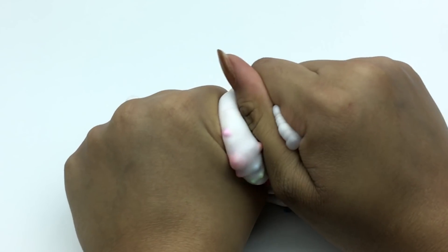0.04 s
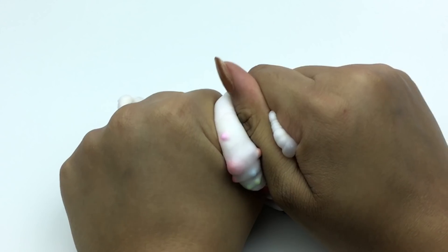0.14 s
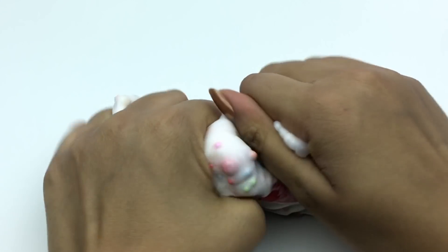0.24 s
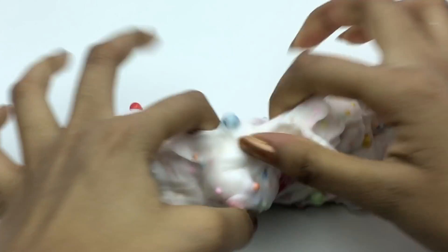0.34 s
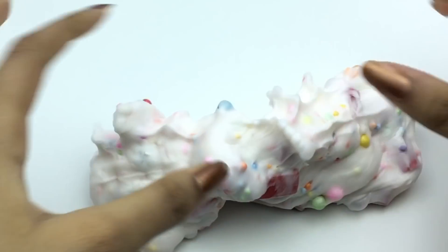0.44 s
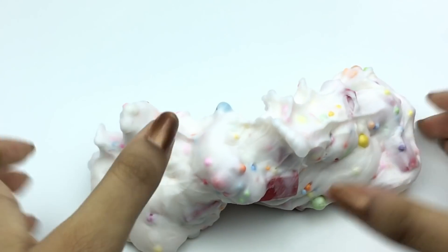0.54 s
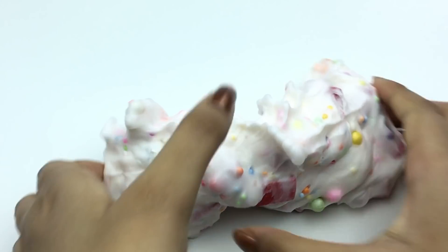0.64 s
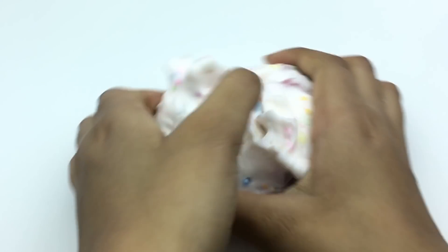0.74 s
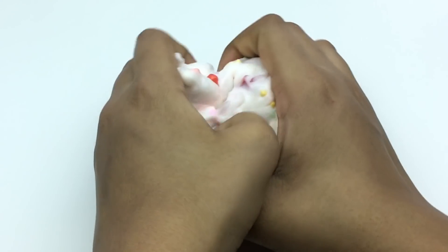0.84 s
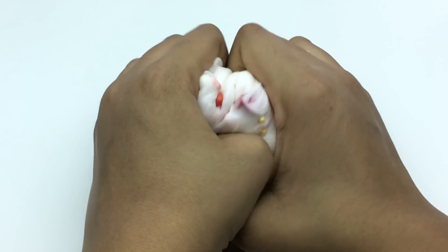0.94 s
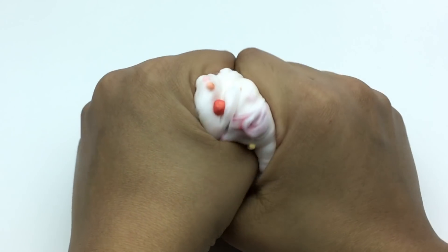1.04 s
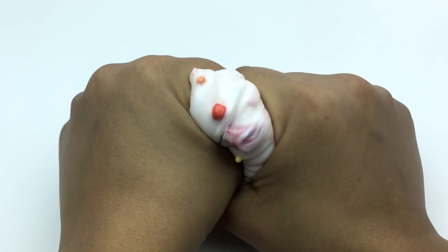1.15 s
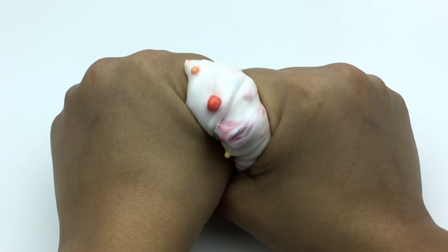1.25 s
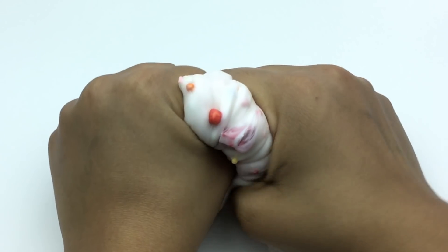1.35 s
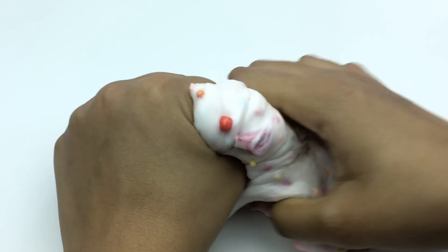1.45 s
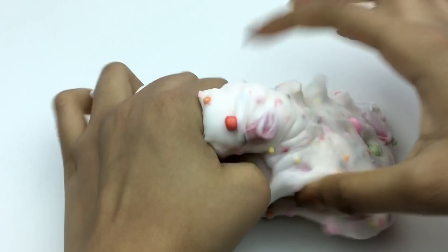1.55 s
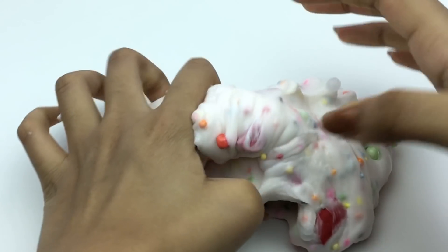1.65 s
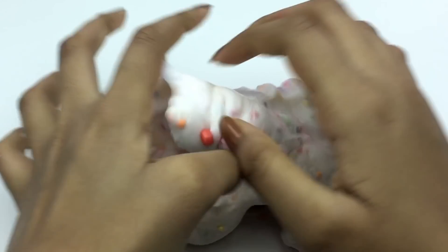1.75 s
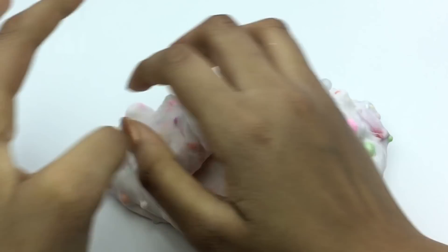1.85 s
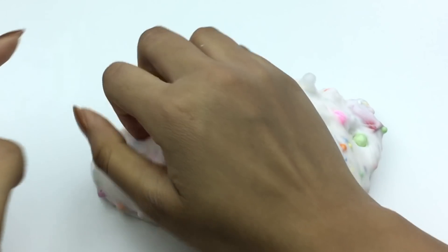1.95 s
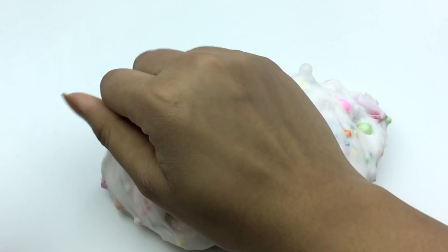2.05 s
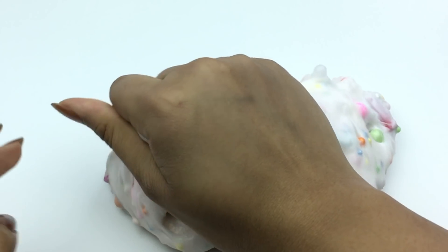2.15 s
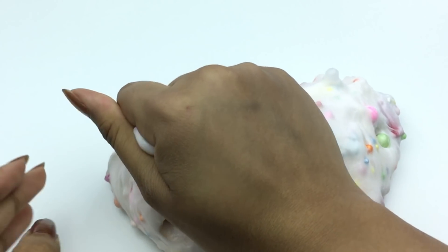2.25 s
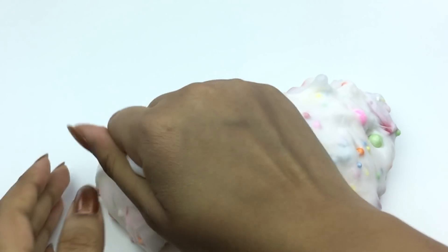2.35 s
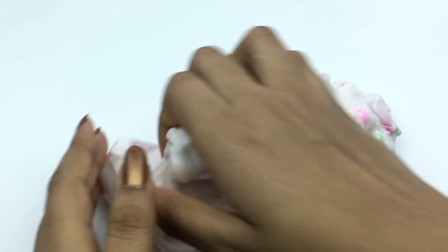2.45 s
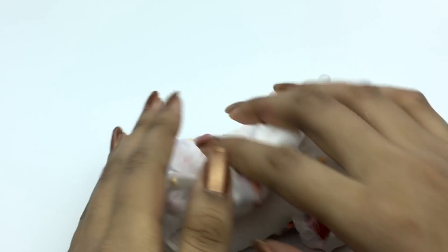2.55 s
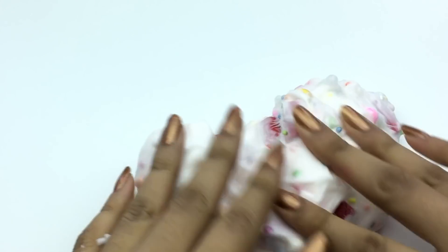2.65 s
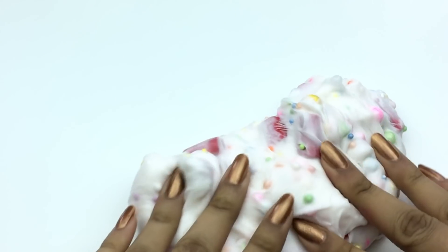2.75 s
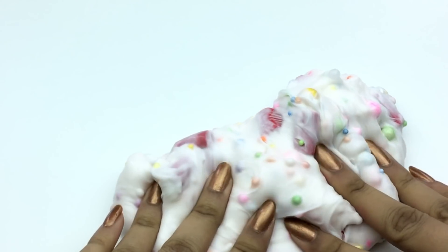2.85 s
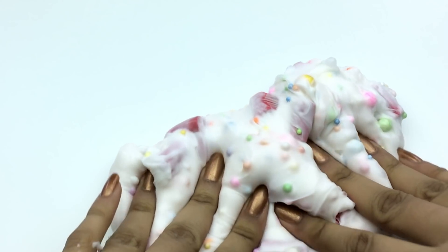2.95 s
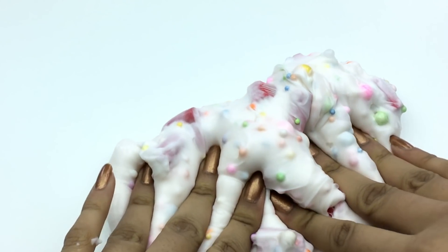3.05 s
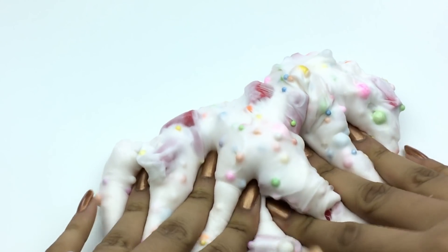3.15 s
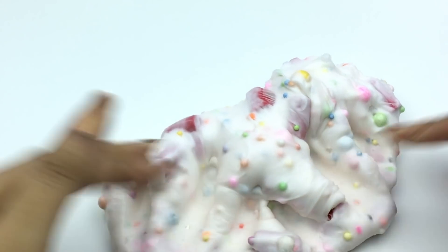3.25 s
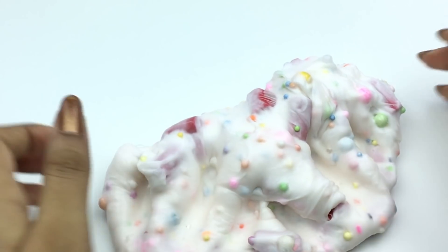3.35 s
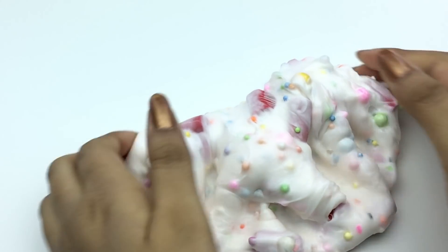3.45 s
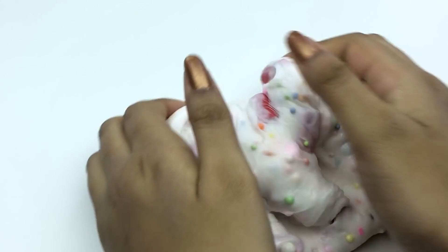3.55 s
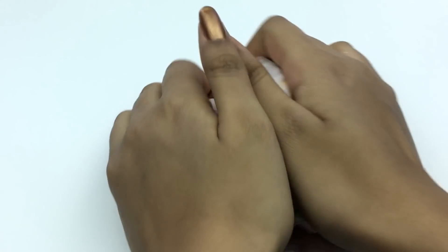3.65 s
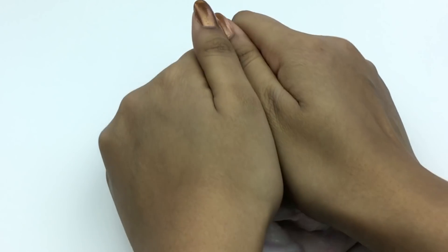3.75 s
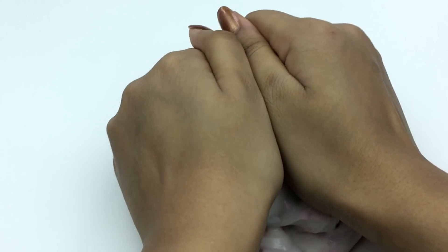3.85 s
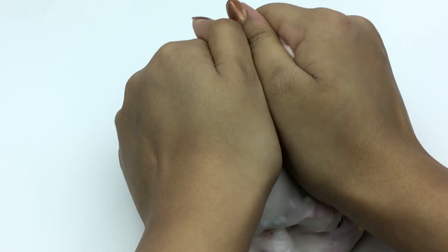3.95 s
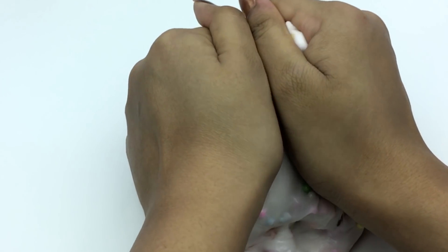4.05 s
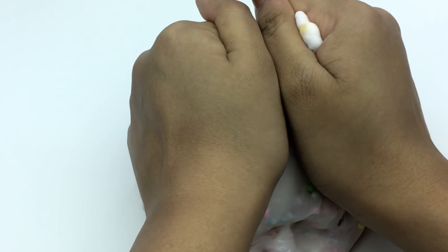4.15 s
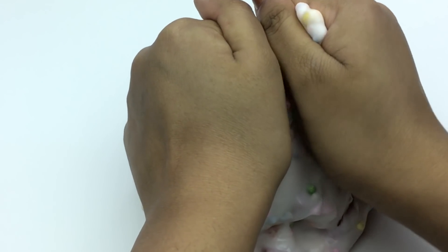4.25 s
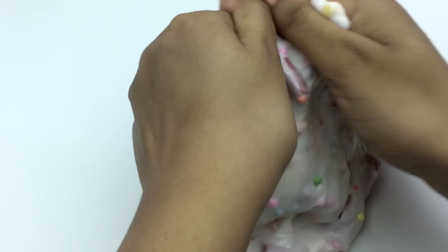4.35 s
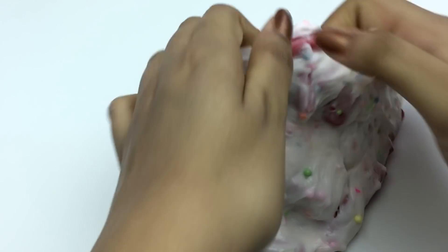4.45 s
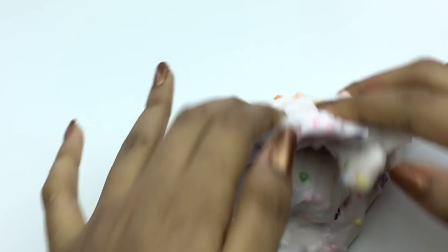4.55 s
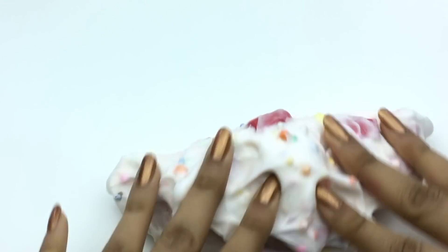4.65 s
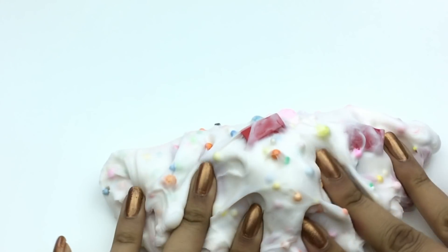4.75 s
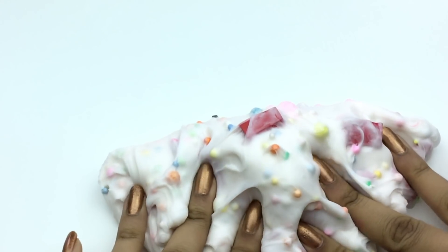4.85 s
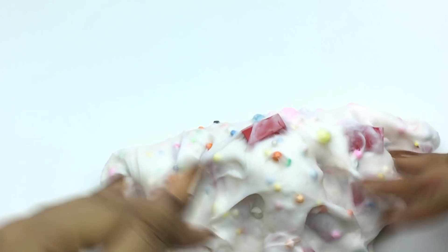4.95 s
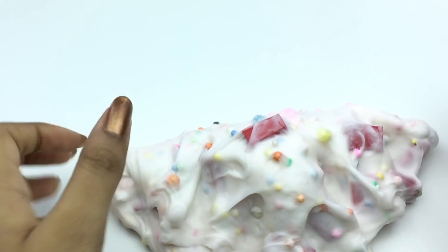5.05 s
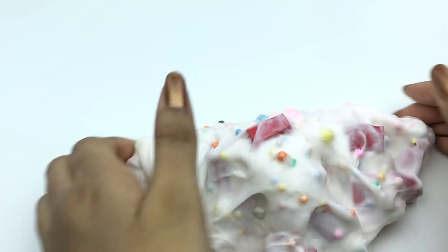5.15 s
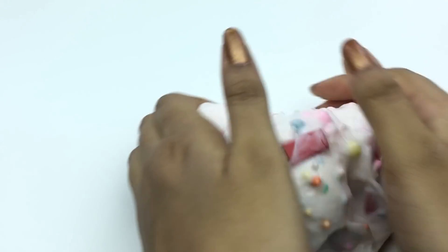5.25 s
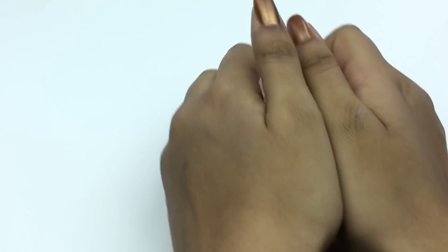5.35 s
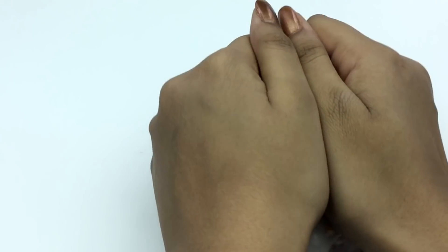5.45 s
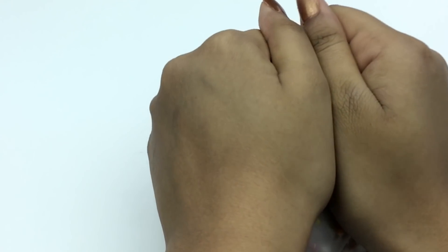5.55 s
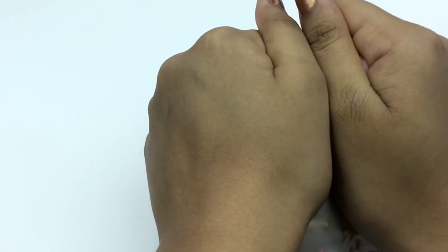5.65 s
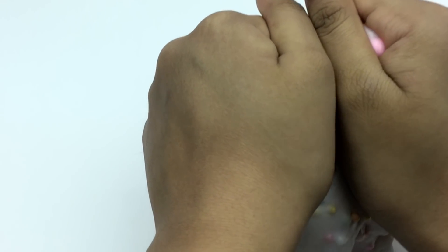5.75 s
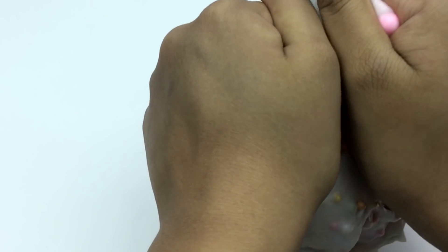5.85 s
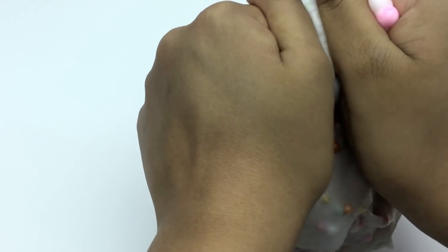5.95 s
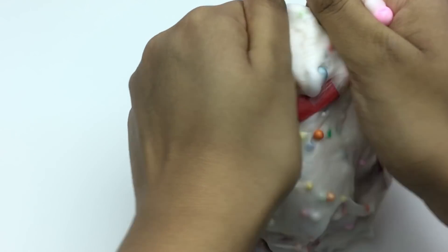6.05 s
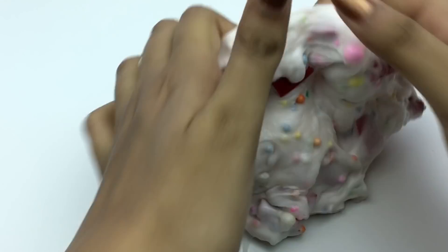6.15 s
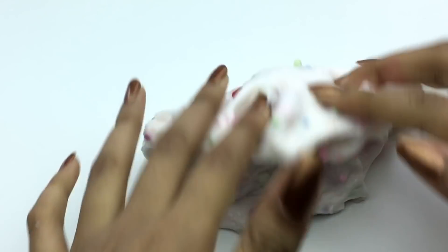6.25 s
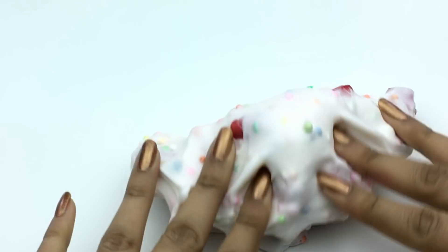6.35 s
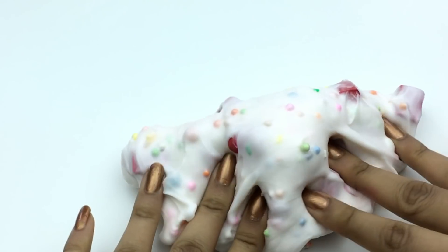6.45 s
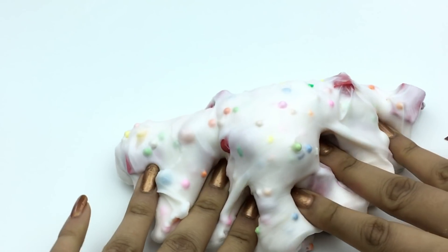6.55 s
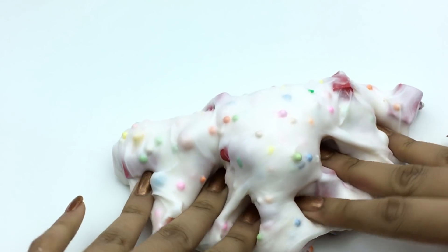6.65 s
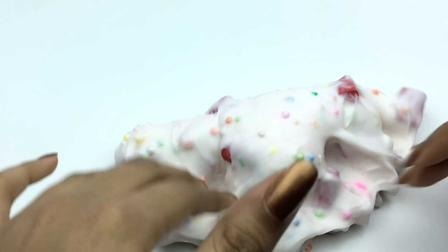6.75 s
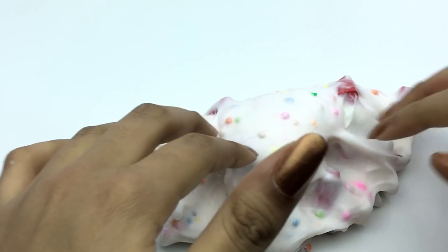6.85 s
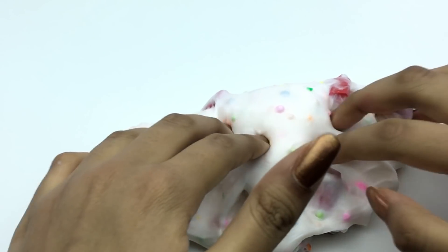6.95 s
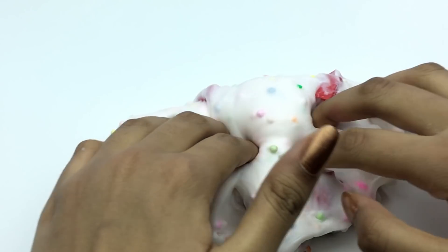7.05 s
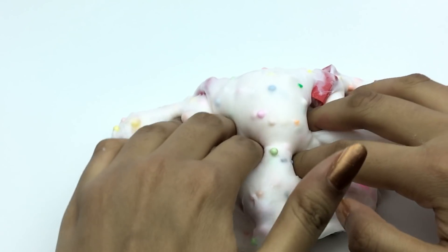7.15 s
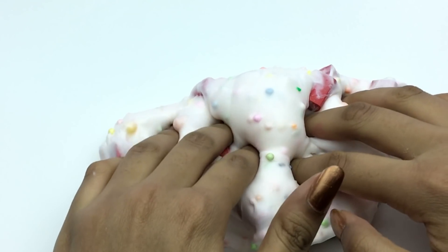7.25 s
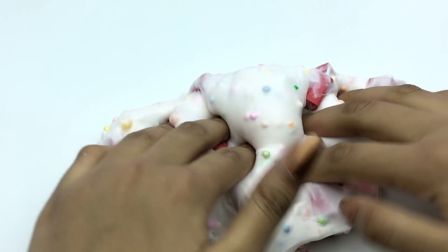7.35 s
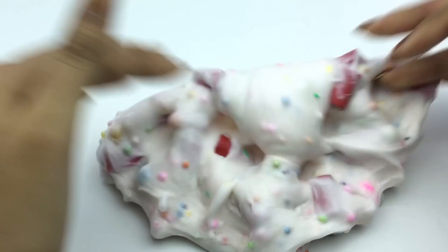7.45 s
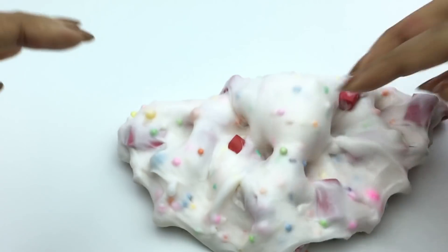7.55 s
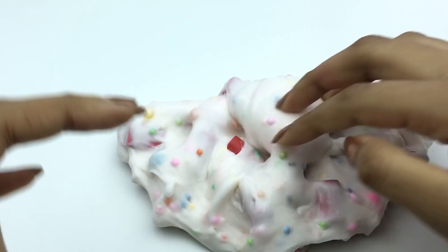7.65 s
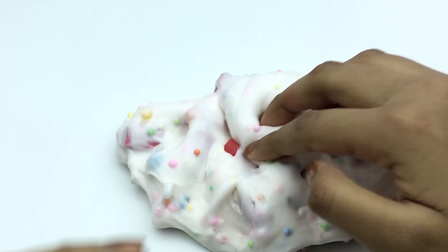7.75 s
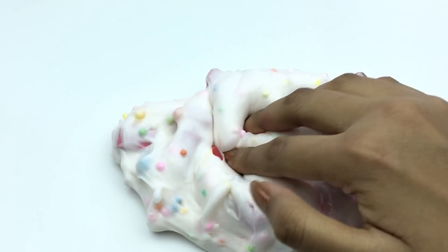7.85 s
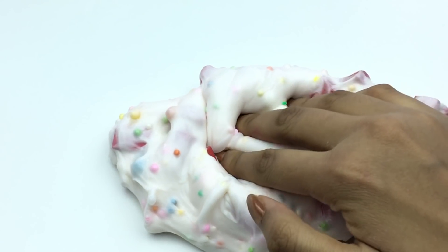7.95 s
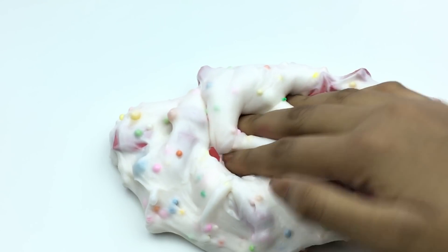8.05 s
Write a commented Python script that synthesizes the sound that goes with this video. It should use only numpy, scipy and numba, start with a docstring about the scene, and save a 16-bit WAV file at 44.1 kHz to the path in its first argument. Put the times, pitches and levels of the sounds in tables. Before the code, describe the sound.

Very close to one microphone in a small quiet room, two hands squeeze sticky, bead-filled slime. Trapped air bursts in sharp, irregular pops, loudest near the start, just after one second and just before six. Fine crackling and moist squelching swell with each pull, while fingers thump softly on the table. The later part is sparser, with a firm peel and knocks around seven and a half seconds.

```python
"""Kneading bead-filled slime

Two hands knead a sticky, bead-filled slime on a table top, close to one microphone in a small quiet room.
Trapped air pockets burst as sharp pops: short rings with a snap, a thud and scattered echoes.
The peeling film crackles in swarms of tiny decaying sines, and larger wet bubbles squelch the same way.
Fingers and slime knock and press the table board, whose low modes ring, over room tone and a low rumble."""
import sys
import numpy as np
from scipy import signal
from scipy.fft import rfft, irfft
from scipy.io import wavfile
from scipy.ndimage import uniform_filter1d
from numba import njit

SR = 44100
rng = np.random.default_rng(int(sys.argv[2]) if len(sys.argv) > 2 else 0)


def store_pcm(level_fs):
    """Save levels as 16-bit WAV."""
    pcm = np.round(np.clip(level_fs, -1, 1) * 32767).astype(np.int16)
    wavfile.write(sys.argv[1], SR, np.atleast_2d(pcm).T)


N = 357651  # length in samples


def undb(db):
    """Gain factor for a level in dB."""
    return 10 ** (np.asarray(db) / 20)


def level(x, db):
    """Scale x by its RMS; db is the RMS level it comes out at."""
    return x * undb(db) / np.sqrt(np.mean(x ** 2))


def fade(t60, size):
    """Exponential decay of 60 dB in t60 seconds."""
    return np.exp(-np.log(1000) * np.arange(size) / SR / t60)


def ring(hz, t60, size):
    """A decaying sine with peak 1."""
    y = fade(t60, size) * np.sin(2 * np.pi * hz * np.arange(size) / SR)
    return y / np.abs(y).max()


def add(out, s, x):
    """Mix x into out from time s in seconds."""
    i = int(s * SR)
    out[i:i + len(x)] += x[:max(len(out) - i, 0)]


def pops():
    """Each pocket snaps, rings a few cycles at its cavity pitch over a short thud, then echoes."""
    # Bursting air pockets. Each row: start in seconds, level of the ring in dB, cavity pitch in Hz,
    # bright snap in dB against the ring, echo send in dB (strong inside cupped hands, weak in the open).
    pockets = [(0.0518, -23.5, 2080, 14, -18.5), (.1456, -5.5, 8370, -43, -10),
               (0.1636, -17.5, 11800, -26, -12), (0.3128, -39, 1320, -15, -8), (0.3239, -47, 1430, -13, 3),
               (.3314, -30, 1390, 1, -11), (0.3361, -24.5, 2730, -22, -16), (.359, -36.5, 1780, -2, -3),
               (0.717, -43, 9000, -10, -13), (0.8923, -28.5, 3140, -37, -13.5),
               (0.9158, -31, 2110, -32, -13), (0.9525, -28.5, 13100, 5, -14.5),
               (1.027, -39.5, 2030, -14, -2), (1.0593, -22.5, 7400, -18, -19),
               (1.0778, -28, 6350, -12, -34), (1.0825, -14, 6000, -27, -16),
               (1.1044, -31, 11100, 13.5, -13.5), (1.1079, -22, 4470, -18, -14),
               (1.1362, -34, 6200, -12, -13), (1.152, -6.5, 10500, -15, -10.5),
               (1.1588, -7, 6100, -17.5, -15), (1.1999, -17.5, 7440, 7, -12), (1.237, -19, 12300, 0, -11.5),
               (1.2621, -29, 6240, 9, -4), (1.2818, -30, 8000, -3, -17), (1.4471, -31, 2590, 12, -17.5),
               (1.5186, -27.5, 4200, -28, -13), (1.5657, -27.5, 1120, -15, -15),
               (1.6179, -24.5, 1350, -28, -15), (1.7382, -36, 1600, -16, -11.5),
               (1.7826, -42.5, 6450, -10, -14), (2.095, -43.5, 1500, 2, -20),
               (2.1095, -36, 6090, -29.5, -19), (2.1241, -38, 1560, 9.5, -22),
               (2.1894, -35.5, 1050, 6.5, -12), (2.2047, -34, 9800, 0, -19), (2.2117, -31, 8890, -6, -15),
               (2.226, -27.5, 6550, 10, -17), (2.2395, -22.5, 9500, -7, -12), (2.2575, -34, 2120, -12, -16),
               (2.2698, -32, 3060, 4.5, -13), (2.3802, -47, 5840, -3, -16), (2.5054, -32, 1140, -4.5, -10),
               (2.59, -48.5, 6050, -9, -17), (2.7698, -42.5, 12860, -8.5, -26),
               (2.8298, -45, 11300, 5, -35), (2.9045, -26, 7700, -13.5, -18.5),
               (2.936, -27.5, 3540, -10.5, -23), (2.9988, -46, 1340, -4, -8.5),
               (3.1046, -30, 1450, -18, -16), (3.1145, -34, 1120, 13.5, -34), (3.1888, -45, 7260, -10, -16),
               (3.2253, -42.5, 1730, -27, -22.5), (3.2668, -34, 12100, -6, -19),
               (3.3039, -33, 3700, -15, -31), (3.752, -39.5, 1570, 3, -20), (3.7803, -36, 1900, -5, -10.5),
               (3.8232, -41, 13500, 4.5, -20), (3.8377, -45, 1650, 3, -14), (3.9, -44, 1910, 23.5, -15),
               (3.9041, -24.5, 1800, -29, -12.5), (4.0032, -34, 1580, -19, -19), (4.02, -38, 6000, 2, -15),
               (4.0257, -31.5, 6300, -17, -13), (4.048, -35, 3500, 10, -8.5), (4.091, -25, 6400, -2, -13),
               (4.135, -41.5, 1860, 19.5, -16.5), (4.1647, -24, 1870, -2, -14.5),
               (4.1723, -20.5, 12400, 9.5, -16), (4.1849, -27.5, 7000, -10, -11),
               (4.2076, -35, 1830, 19.5, -12.5), (4.2769, -25.5, 1090, 5.5, -17),
               (4.3013, -35, 4400, 27, -11.5), (4.6905, -44, 8100, 2, -27.5),
               (4.7502, -38.5, 13890, 2, -16), (4.809, -56, 1490, 0, -9), (4.822, -49, 9300, -5, -25),
               (4.845, -43.5, 1530, -6, -15), (4.861, -40, 9270, 7.5, -22), (5.003, -39.5, 9000, -2, -8.5),
               (5.026, -30.5, 12000, -4, -16.5), (5.2487, -40.5, 4050, -9, -8.5),
               (5.268, -43, 8900, 0, -13), (5.287, -38.5, 4030, 5, -17), (5.3032, -33, 4200, -36, -15),
               (5.4128, -44, 1920, 5, -27), (5.463, -46, 1500, 1.5, -20), (5.5304, -50, 5500, 20.5, -15),
               (5.5428, -23.5, 1680, -30, -11.5), (5.5588, -12, 7400, -20, -14.5),
               (5.6615, -40, 7150, 17.5, -19), (5.6776, -19.5, 7800, -1.5, -17), (5.694, -37, 890, 0, -16),
               (5.755, -27, 9200, -11, -13.5), (5.7835, -35, 2180, 18.5, -11),
               (5.812, -24, 11700, 8.5, -20), (5.836, -23.5, 4500, 20, -19.5),
               (5.8419, -15.5, 4160, -33, -17.5), (5.8674, -34, 3640, -10, -10),
               (5.8857, -8.5, 13200, -19, -24), (5.888, -7, 11200, -38, -23.5),
               (5.9218, -22, 8100, -0.5, -10.5), (5.9415, -38, 6500, -10, -20),
               (5.9725, -39, 1480, 25, -11), (6.03, -41, 1200, -7, -16), (6.0835, -36, 7660, -7, -19.5),
               (6.5211, -47, 8650, -10, -24), (6.5316, -34.5, 1390, 5.5, -19),
               (6.5587, -43, 2670, 8.5, -20), (6.611, -48, 7100, -17, -12),
               (6.6801, -43.5, 6250, 11, -17.5), (6.8015, -38, 4500, 14, -13),
               (6.8193, -33, 6200, -15, -15.5), (7.1262, -42, 5360, -14.5, -12),
               (7.1357, -40, 11950, -2.5, -13), (7.237, -52, 2140, 6, -20), (7.34, -45, 5530, -18.5, -18.5),
               (7.4805, -20, 3830, -6, -19), (7.5003, -23.5, 7000, -3, -16), (7.584, -41.5, 5500, -3, -25),
               (7.6508, -33.5, 1060, -17, -14), (8.071, -45.5, 930, -13, -14)]
    out = np.zeros(N)
    for s, db, hz, snap_db, echo_db in pockets:
        stronger_db = db + 30
        # cycles until the ring is down 60 dB: higher and stronger pockets ring for more of them
        cycles = 8.3 + 3.3 * np.log2(hz / 4000) + 0.08 * stronger_db
        pop = undb(db) * ring(hz, max(cycles, 1) / hz, size=512)
        # the film itself tearing
        pop += undb(db + snap_db) * ring(9100.0, 0.0003, size=512)
        # the thud grows by only 0.4 of the pop's dB
        thud_db = -71.5 + 0.4 * stronger_db
        pop += undb(thud_db) * ring(590.0, 0.012, size=512)
        add(out, s, pop)
        add(out, s, undb(echo_db) * signal.fftconvolve(echoes(), pop))
    # so small a source pushes no bass
    return signal.sosfilt(signal.butter(2, 450., "highpass", fs=SR, output="sos"), out)


def echoes(near_t60=0.014, far_t60=0.14, far_db=-9, patchy_db=4, gap_s=0.00033, size=6144):
    """Scattered returns: quick ones from hands and table, a longer wash from the walls."""
    shape = fade(near_t60, size) + undb(far_db) * fade(far_t60, size)
    patches = undb(patchy_db * rng.standard_normal(size))
    y = rng.standard_normal(size) * patches * shape
    y[:int(gap_s * SR)] = 0
    # set the gain by the energy of the earliest returns
    return y / np.sqrt(np.sum(y[:256] ** 2) / 16)


def film_crackle(effort_db, peel_gain):
    """Film tears as a dense fizz in fluttering clumps, with sparse dry ticks; kneading and peels drive both."""
    # Tick loudness by pitch. Each row: pitch in Hz, relative level in dB.
    film_sizes = [(2500, -3), (4200, 1.5), (6500, 6), (10000, 4), (14000, 3.5)]
    fizz = swarm(film_sizes, per_s=5000., cycles=6.0, scatter_db=3.1, echo_db=-14.0, size=16384)
    # lone threads of film that tear with a dry, broad tick
    ticks = swarm(film_sizes, per_s=150., cycles=3.0, scatter_db=3.0, echo_db=-18.0, size=32768)
    gain = undb(effort_db) + peel_gain
    return gain * (flutter() * fizz + undb(-5) * ticks)


def wet_squelch(effort_db, peel_gain):
    """Larger wet bubbles ring lower and sparser; their level grows more slowly with effort than the crackle."""
    # Bubble loudness by pitch. Each row: pitch in Hz, relative level in dB.
    bubble_sizes = [(300, -27.5), (600, 1), (1200, 3.5), (2500, 8.5)]
    bubbles = swarm(bubble_sizes, per_s=900., cycles=5.0, scatter_db=3.8, echo_db=-12.0, size=16384)
    kneading_db = -70 + 0.94 * (effort_db + 70)
    gain = undb(kneading_db) + peel_gain
    return gain * flutter() * bubbles


def peels(size=16384):
    """Gain of the film crackle and of the squelch: each pull swells to its climax and dies away."""
    # Slime peeling off skin or table in one pull. Each row: climax in seconds, swell in seconds,
    # die-away t60 in seconds (cut off after size samples), film crackle gain in dB, squelch gain in dB.
    pulls = [(.335, 0.046, 0.64, -52, -47.5), (0.398, 0.024, 0.08, -46, -43),
             (0.451, 0.0057, 0.062, -62, -65), (0.627, 0.0025, 0.091, -57.5, -56),
             (0.687, 0.0091, 0.18, -55.5, -50), (0.997, 0.0027, 0.015, -52, -76),
             (1.473, 0.016, 0.099, -52, -45), (1.598, 0.099, 0.2, -53, -53),
             (1.85, .012, 0.026, -62.5, -65), (2.505, 0.11, 0.22, -56, -58),
             (3.279, 0.032, 0.078, -56, -63.5), (3.301, 0.036, 0.15, -52, -51.5),
             (3.463, 0.0017, 0.085, -55, -44.5), (4.42, 0.041, 0.78, -57, -67), (4.473, 0.016, 1, -63, -68),
             (5.022, 0.046, 0.1, -61, -65), (5.18, 0.0026, 0.087, -53.5, -49),
             (6.203, 0.092, 0.39, -52, -63), (6.81, 0.059, 0.11, -56.5, -61),
             (7.135, 0.011, 0.42, -77.5, -74.5), (7.505, 0.038, 0.24, -48.5, -46.5),
             (7.632, 0.0029, 0.12, -64, -63)]
    film, squelch = np.zeros((2, N))
    for s, swell_s, t60, film_db, squelch_db in pulls:
        swell = np.arange(0, 1, 1 / (swell_s * SR))
        shape = np.append(swell, fade(t60, size))
        add(film, s - swell_s, undb(film_db) * shape)
        add(squelch, s - swell_s, undb(squelch_db) * shape)
    return film, squelch


def swarm(sizes, per_s, cycles, scatter_db, echo_db, size=8192):
    """Random ticks, most tiny and a few large, each ringing at the pitch of its own bubble."""
    size_hz, size_db = np.transpose(sizes)
    when, place, side, luck = rng.random((int(per_s * N / SR), 4)).T
    # pitches spread evenly over the octaves
    hz = size_hz[0] * (size_hz[-1] / size_hz[0]) ** place
    db = np.interp(np.log(hz), np.log(size_hz), size_db)
    # exponential scatter, capped so that no tick sticks out too far
    db += scatter_db * np.minimum(-np.log(1 - luck), 4.5)
    gain = np.sign(side - .5) * undb(db)
    ticks = grains(N, (when * N).astype(np.int64), hz, cycles, gain, float(SR))
    out = ticks.copy()
    # the hands keep moving, so each block of size samples gets a new echo pattern
    for i in range(0, N, size):
        add(out, i / SR, undb(echo_db) * signal.fftconvolve(ticks[i:i + size], echoes()))
    return level(out, 0)


@njit
def grains(size, start, hz, cycles, gain, sr):
    """Adds one sine for each grain, decaying by 60 dB over the given cycles."""
    out = np.zeros(size)
    for k in range(len(start)):
        # turning and shrinking a complex number each sample draws the decaying sine
        turn = np.exp((2j * np.pi - np.log(1000) / cycles) * hz[k] / sr)
        z = gain[k] + 0j
        for i in range(start[k], min(start[k] + int(cycles * sr / hz[k]), size)):
            out[i] += z.imag
            z *= turn
    return out


def flutter(per_s=70, spread_db=3.5):
    """Gain that jumps about quickly, with short glides: the film lets go in clumps."""
    hold = int(SR / per_s)
    steps = np.repeat(rng.standard_normal(N // hold + 1), hold)[:N]
    glides = uniform_filter1d(steps, size=hold // 2)
    return level(undb(spread_db * glides), 0)


def table(pressure):
    """Knocks and shifting finger pressure both drive the modes of the board."""
    # Modes of the table board. Each row: pitch in Hz, relative level in dB, t60 in seconds.
    modes = [(150, -5, .1), (197, 0, .16), (245, -6, .1), (410, -16, .05), (630, -10, .07)]
    # Knocks on the table. Each row: start in seconds, peak of the board's ring in dB.
    knocks = [(0.39, -43.5), (0.501, -53), (0.632, -46.5), (0.689, -45), (1.469, -46), (1.552, -51),
              (1.648, -44.5), (1.739, -56), (2.416, -51.5), (3.109, -51.5), (3.271, -48.5), (3.3, -43.5),
              (3.46, -37.5), (5.014, -43), (5.186, -40.5), (6.172, -57), (6.601, -56.5), (6.67, -58),
              (6.74, -58.5), (6.821, -44.5), (7.408, -58), (7.482, -40), (7.502, -32), (7.629, -47),
              (7.652, -33)]
    board = sum(undb(db) * ring(hz, t60, size=8192) for hz, db, t60 in modes)
    rubbing = signal.fftconvolve(rng.standard_normal(N), board)[:N]
    out = pressure * level(rubbing, -2.5)
    puff_band = signal.butter(2, [150., 550.], "bandpass", fs=SR, output="sos")
    for s, db in knocks:
        # soft flesh lands as a short rough push, not a single tap
        push_shape = fade(0.1, size=4096) - fade(0.0033, size=4096)
        push = rng.standard_normal(4096) * push_shape
        knock = signal.fftconvolve(push, board)
        # the slime between hand and board adds a dull, broad puff
        puff = signal.sosfilt(puff_band, push)
        add(out, s, undb(db) * knock / np.abs(knock).max())
        add(out, s, undb(db - 3.0) * puff / np.abs(puff).max())
    return out


def finger_pressure(squelch_peel, t60=0.65, lean_db=-4.5, rest_db=-74):
    """Each pull leans on the board, then lets go slowly, as a one-pole smoothing; resting hands add a floor."""
    keep = undb(-60 / (t60 * SR))
    lean = signal.lfilter([1 - keep], [1, -keep], squelch_peel)
    return undb(rest_db) + undb(lean_db) * lean


def room():
    """Steady hiss and hum of the room as shaped noise, with a distant low rumble that swells."""
    # Spectrum of the room tone. Each row: frequency in Hz, relative density in dB per Hz.
    tone_curve = [(15, -54), (25, -30.5), (48, 3.5), (160, -9.5), (242, -1), (326, -14), (779, -37),
                  (874, -35.5), (2820, -37), (6000, -39.5), (7800, -58.5), (13200, -120)]
    # Distant low rumble. Each row: time in seconds, gain in dB.
    rumble_curve = [(0.0, -87), (0.09, -73), (0.74, -64), (1.4, -82), (1.47, -66.5), (5.92, -71),
                    (6.25, -53), (6.5, -75.5), (6.62, -53.5), (7.34, -83), (7.54, -65), (8.11, -76.5)]
    hz, db = np.transpose(tone_curve)
    f = np.arange(N // 2 + 1) * SR / N + 1  # 1 Hz up, to keep the logarithm finite
    tone_gain = undb(np.interp(np.log(f), np.log(hz), db))
    tone = irfft(rfft(rng.standard_normal(N)) * tone_gain, N)
    low_band = signal.butter(2, [48., 85.], "bandpass", fs=SR, output="sos")
    low = signal.sosfilt(low_band, rng.standard_normal(N))
    rumble_db = np.interp(np.arange(N) / SR, *np.transpose(rumble_curve))
    return level(tone, -72.5) + undb(rumble_db) * level(low, 0)


def scene():
    """Kneading effort and single peels drive the slime; pops, table and room join in."""
    # Kneading effort, as the gain of the film crackle. Each row: time in seconds, gain in dB.
    kneading = [(0, -57.5), (.13, -66), (.48, -72), (.5, -86.5), (.62, -79), (.81, -60.5), (.99, -71.5),
                (1.14, -53), (1.42, -72), (1.63, -56.5), (1.76, -63.5), (1.86, -70.5), (1.88, -79),
                (2.08, -76), (2.26, -68), (2.9, -79), (3.12, -69.5), (3.4, -97), (3.5, -59.5), (3.9, -72),
                (4.16, -59), (4.6, -81), (4.72, -81.5), (5.4, -61.5), (5.45, -72.5), (5.83, -67),
                (6.17, -70), (6.6, -84.5), (8.11, -79.5)]
    effort_db = np.interp(np.arange(N) / SR, *np.transpose(kneading))
    film_peel, squelch_peel = peels()
    slime = pops() + film_crackle(effort_db, film_peel) + wet_squelch(effort_db, squelch_peel)
    mix = slime + table(finger_pressure(squelch_peel)) + room()
    return mix[None]  # one channel


def record(dry):
    """The microphone hisses faintly and drops the deepest bass; the recorder cuts the top."""
    hiss_db, bass_cut_hz, top_hz = -90, 40., 15900
    wet = dry + level(rng.standard_normal(N), hiss_db)
    wet = signal.sosfilt(signal.butter(2, bass_cut_hz, "highpass", fs=SR, output="sos"), wet)
    return signal.sosfilt(signal.ellip(8, .2, 70, top_hz, fs=SR, output="sos"), wet)


dry = scene()
out = record(dry)
store_pcm(out)
```